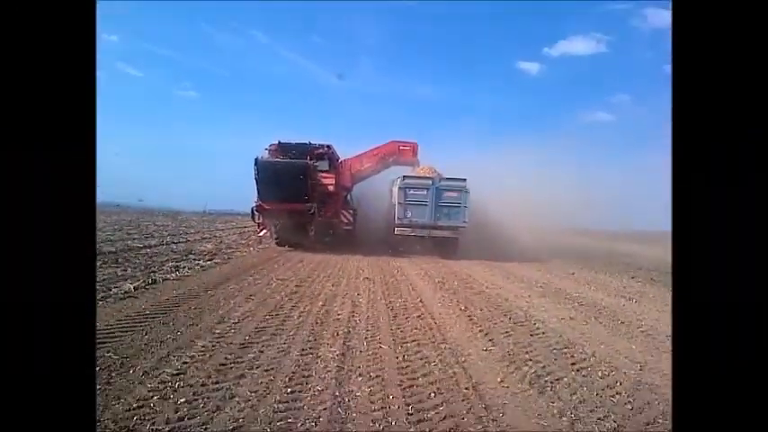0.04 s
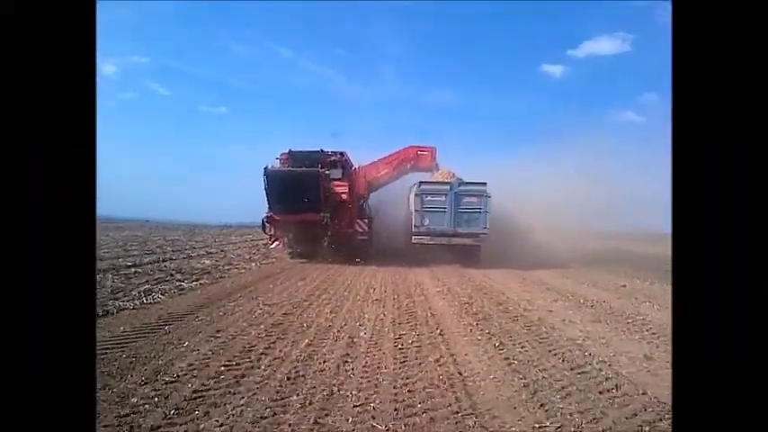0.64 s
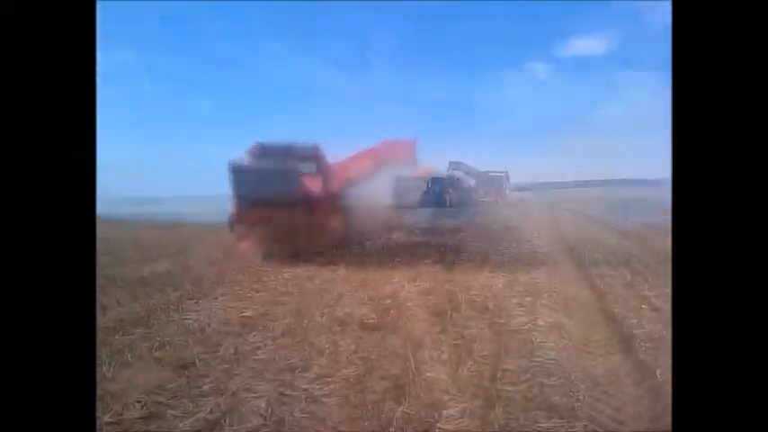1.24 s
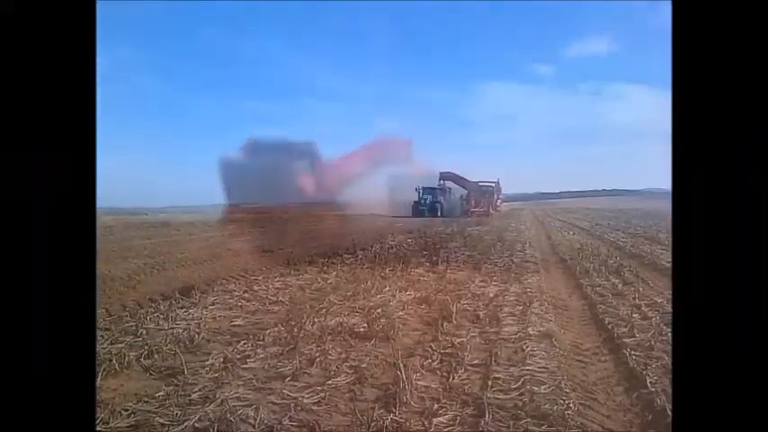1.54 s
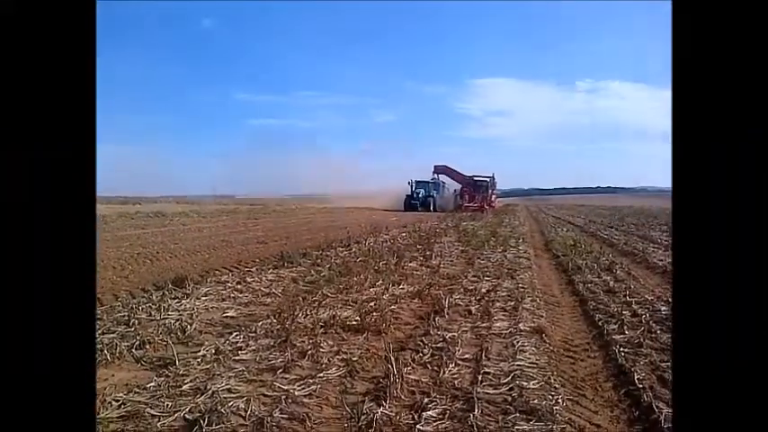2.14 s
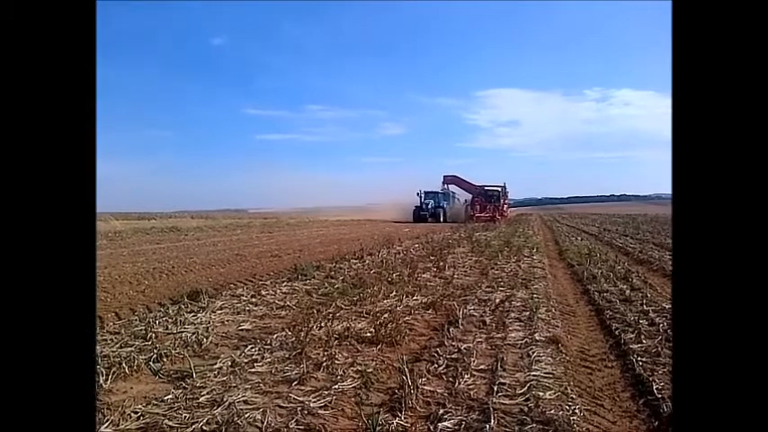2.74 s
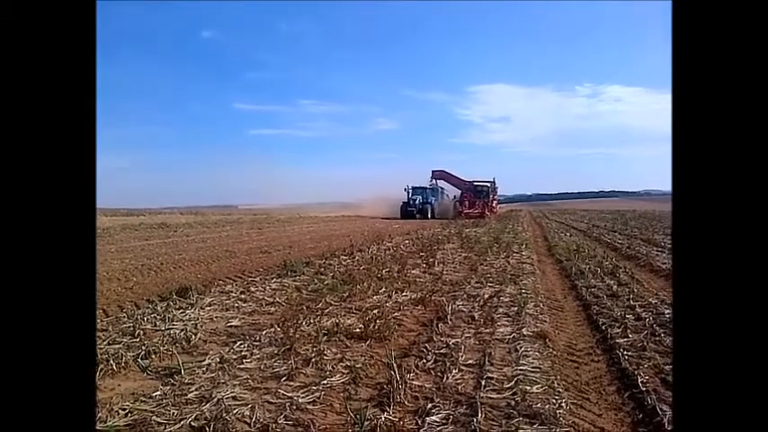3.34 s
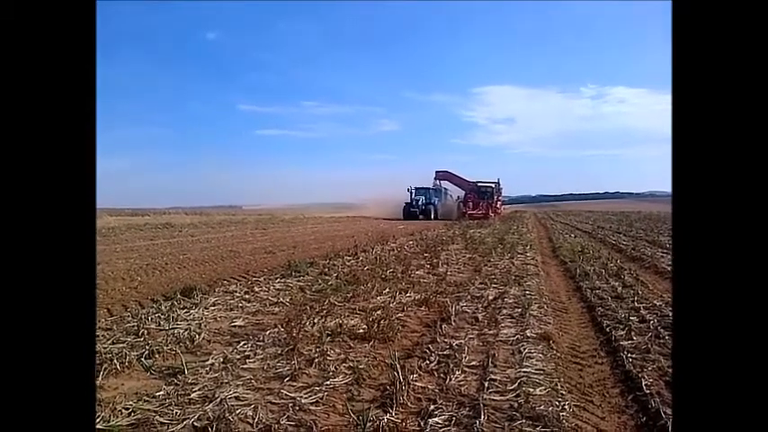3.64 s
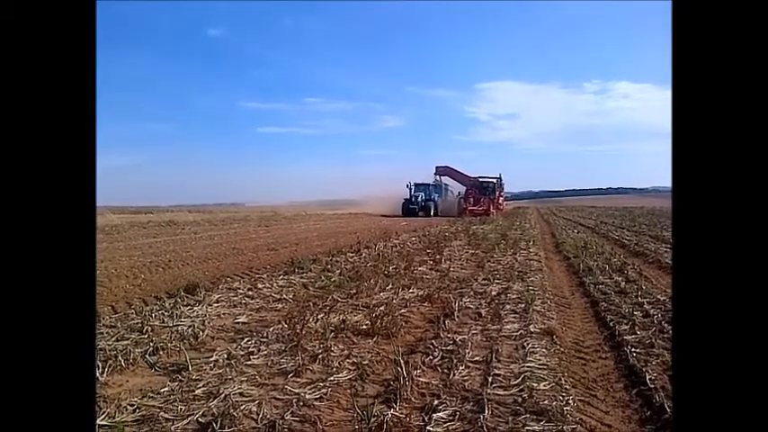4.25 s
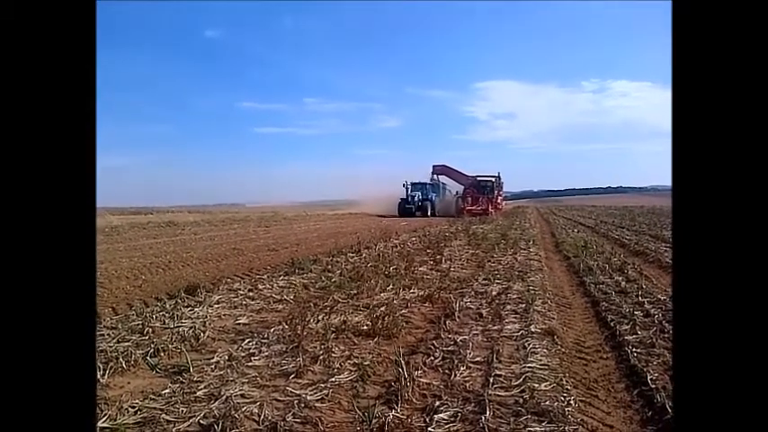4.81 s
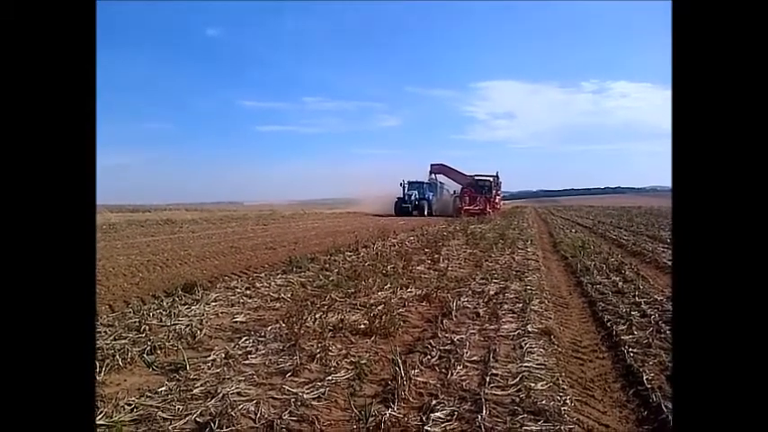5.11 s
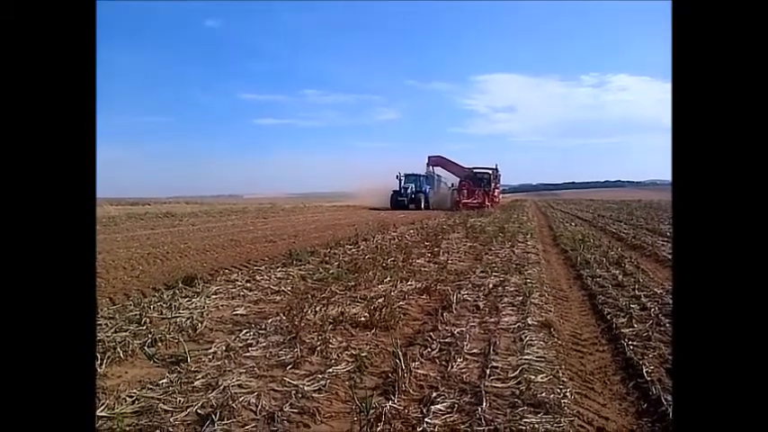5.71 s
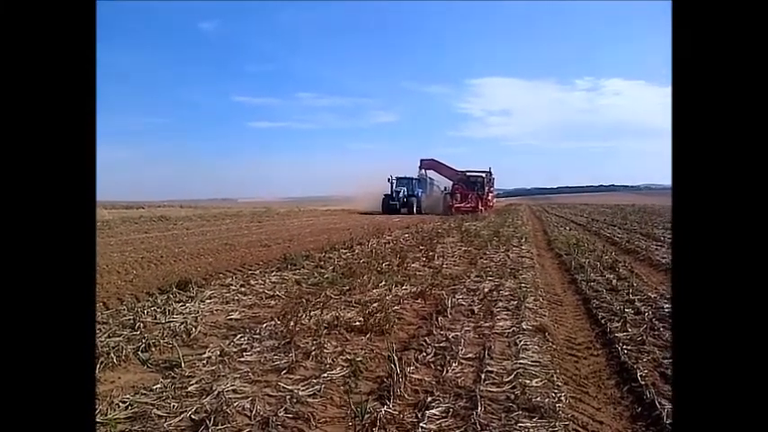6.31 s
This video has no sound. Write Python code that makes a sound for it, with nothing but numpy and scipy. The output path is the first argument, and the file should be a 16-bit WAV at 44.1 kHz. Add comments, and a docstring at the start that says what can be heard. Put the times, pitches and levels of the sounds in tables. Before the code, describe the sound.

A nearby farm harvester rumbles and rattles, giving way to quiet, far-off machinery with gusts on the microphone and dry leaves ticking.

```python
"""A root-crop harvester works close by: its diesel drones, gears whine, panels rumble and the sieve web
rattles. A dry roller squeaks, the hollow bunker booms, then stones and steel clank on the web.
From 0.84 s to about 2.1 s the scene dissolves to a harvester and tractor far away, two exhaust hums
that grow louder as they draw nearer. To the end, eddies of wind flutter on the microphone and dry
stalks rustle and tick in the breeze."""
import sys
import numpy as np
from scipy import signal
from scipy.fft import rfft, irfft, next_fast_len
from scipy.io import wavfile
from scipy.ndimage import uniform_filter1d, map_coordinates

SR = 44100
rng = np.random.default_rng(int(sys.argv[2]) if len(sys.argv) > 2 else 0)


def generate_wav(signal):
    """Clip the signal to [-1, 1] and save it as 16-bit WAV at the path in sys.argv[1]."""
    frames = np.transpose(np.atleast_2d(signal))
    scaled = np.clip(frames, -1, 1) * 32767
    pcm = np.round(scaled).astype(np.int16)
    wavfile.write(sys.argv[1], SR, pcm)


N = 280917
TIME_S = np.arange(N) / SR


def amp(db):
    """Decibels to gain."""
    return 10 ** (np.asarray(db) / 20)


def unit(x):
    """x at rms 1."""
    return x / np.sqrt(np.mean(x ** 2) + 1e-20)


def noise():
    """White noise."""
    return rng.standard_normal(N)


def wobble(rate_hz):
    """Smooth random curve, rate_hz knots a second."""
    coarse_s = TIME_S[::16]
    knots = rng.standard_normal(N // 64)
    return np.interp(TIME_S, coarse_s, map_coordinates(knots, [coarse_s * rate_hz + 2], mode="wrap"))


def swells(rows):
    """Sum of smooth bumps. Each row: centre in seconds, length in seconds, height."""
    return sum(height * np.exp(-np.abs(2 * (TIME_S - s) / length_s) ** 3) for s, length_s, height in rows)


def pulse(centre_s, half_s):
    """Bell envelope with exponential tails, peak 1."""
    return 1 / np.cosh(np.clip((TIME_S - centre_s) / half_s, -20, 20))


def ramp(start_s, end_s):
    """Linear rise from 0 to 1, then held."""
    return np.clip((TIME_S - start_s) / (end_s - start_s), 0, 1)


def filtered(x, response):
    """x through a response given as a function of Hz."""
    size = next_fast_len(len(x) + SR // 4)
    return irfft(rfft(x, size) * response(np.fft.rfftfreq(size, 1 / SR)), size)[:len(x)]


def coloured(x, spectrum):
    """x shaped by (Hz, dB) points, at rms 1."""
    points_hz, db = np.transpose(spectrum)
    return unit(filtered(x, lambda hz: amp(np.interp(np.log(hz + 1), np.log(points_hz), db))))


def steadied(x, samples):
    """x divided by its running rms."""
    return x / np.sqrt(np.abs(uniform_filter1d(x ** 2, samples)) + 1e-6)


# Engine speed. Each row: time in seconds, firing rate in Hz.
FIRING_RATE = [(0, 72.3), (.2, 71.2), (.5, 70.3), (.9, 70.1), (1.15, 68.8), (1.5, 67.8), (2.2, 67.5)]
def firing_phase():
    """Phase of the firing cycle in radians; the engine slows slightly."""
    firing_hz = np.interp(TIME_S, *np.transpose(FIRING_RATE))
    return 2 * np.pi * np.cumsum(firing_hz * (1 + .001 * wobble(12))) / SR


# Exhaust orders. Each row: multiple of the firing rate, relative level in dB.
EXHAUST_ORDERS = [(1, -25), (2, -36), (3, -45), (4, -40), (5, -50.5), (6, -59), (7, -49.5)]
# Gear and pump tones. Each row: frequency in Hz at a 70 Hz firing rate, relative level in dB.
GEAR_TONES = [(99, -39), (177.6, -38.5), (366, -46), (654, -48), (745, -52), (931, -54.5), (1121, -55.5),
              (1595, -70), (1703, -67.5), (2048, -69.5)]
def diesel(phase):
    """Firing pulses give the exhaust orders; gears and pumps follow the same shaft, less steadily."""
    exhaust = whine = 0
    for order, db in EXHAUST_ORDERS:
        gain = amp(db + 1.3 * wobble(11))
        exhaust += gain * np.sin(order * phase + .2 * wobble(18) + rng.uniform(0, 2 * np.pi))
    for hz, db in GEAR_TONES:
        gain = amp(db + 1.8 * wobble(12))
        whine += gain * np.sin(hz / 70 * phase + .3 * wobble(10))
    return amp(-2.5) * np.sqrt(2) * (exhaust + whine)


# Throb spectrum. Each row: frequency in Hz, relative density in dB.
THROB_SPECTRUM = [(8, -70), (16, -57), (21, 9), (26, 8.5), (31, 10), (40, -5), (55, -16.5), (90, -16),
                  (160, -59), (400, -120)]
# Heaves and sags. Each row: centre in seconds, length in seconds, gain in dB.
THROB_HEAVES = [(.14, 0.16, 7), (.29, 0.12, -24), (.45, 0.061, -16), (.68, 0.13, -6.5), (1.75, 0.26, -7.5),
                (2.03, 0.17, 0)]
def throb(beat_hz=7.16, crest_s=1.248, depth_db=2.5):
    """The near machine's deep throb beats, heaves and sags."""
    beat_db = depth_db * np.cos(2 * np.pi * beat_hz * (TIME_S - crest_s))
    rumble = steadied(coloured(noise(), THROB_SPECTRUM), samples=5000)
    return amp(-15.5 + beat_db + swells(THROB_HEAVES)) * rumble


# Panel spectrum. Each row: frequency in Hz, relative density in dB.
PANEL_SPECTRUM = [(15, -67), (40, 6.5), (80, -4), (130, 3), (185, -3.5), (215, -6.5), (285, -6.5),
                  (320, -16.5), (380, -14.5), (480, -20), (800, -87), (2500, -120)]
# Load surges. Each row: centre in seconds, length in seconds, gain in dB.
LOAD_SURGES = [(.02, 0.081, 6.5), (.74, 0.051, 8), (.91, 0.11, 7.5), (1.45, 0.21, 6), (1.69, 0.09, 6.5),
               (1.79, 0.24, 5.5)]
def panels():
    """Body panels rumble, louder under load."""
    return amp(-30 + swells(LOAD_SURGES)) * steadied(coloured(noise(), PANEL_SPECTRUM), samples=4000)


# Spectra of the web's din and the fine hiss. Each row: frequency in Hz, relative density in dB.
DIN_SPECTRUM = [(150, -16), (360, 1), (560, -6.5), (670, -5), (760, -8.5), (815, -12), (920, -11),
                (1130, -16), (1350, -20.5), (2580, -29.5), (4700, -35), (7000, -43), (15000, -79)]
HISS_SPECTRUM = [(1000, 3), (5000, -8), (8000, -3), (15000, -3)]
# Changes in the rattling. Each row: centre in seconds, length in seconds, gain in dB.
WEB_RATTLES = [(.07, 0.048, 1), (.16, 0.057, 2), (.86, 0.091, 1), (1.52, 0.19, -0.5), (1.84, 0.19, 2)]
def sieve_web(phase):
    """The web's din pulses with the firing; a fine hiss swells with its rattling."""
    shaking = noise() * (1 + 0.12 * np.sin(phase)) * amp(1.2 * wobble(59.8))
    din = amp(-38.5) * coloured(shaking, DIN_SPECTRUM)
    hiss = amp(-61.5) * coloured(noise(), HISS_SPECTRUM)
    return amp(swells(WEB_RATTLES)) * (din + hiss)


# Roller chirps. Each row: centre in seconds, pitch in Hz, fundamental peak in dB, half length in seconds.
ROLLER_CHIRPS = [(0.085, 5730, -57.5, 0.011), (0.153, 5900, -57, 0.0098), (1.375, 5800, -66, 0.018),
                 (1.9, 5800, -71, 0.0071)]
def roller_squeaks():
    """A dry roller chirps: a scratchy high tone with its octave."""
    out = np.zeros(N)
    for centre_s, hz, db, half_s in ROLLER_CHIRPS:
        phase = 2 * np.pi * hz * TIME_S + 1.4 * wobble(660)
        out += amp(db) * pulse(centre_s, half_s) * (np.sin(phase) + amp(-3.5) * np.sin(2 * phase))
    return out


# Bunker resonances. Each row: centre in seconds, pitch in Hz, peak in dB, half length in seconds.
BUNKER_BOOMS = [(0.109, 363.6, -26.5, 0.0087), (0.437, 281, -32, 0.072), (0.625, 168.7, -26.5, 0.019),
                (0.746, 104, -32, 0.022), (0.75, 196, -39, 0.0083), (0.906, 186, -29.5, 0.012),
                (1.396, 269, -22.5, 0.0061), (1.557, 130, -31, 0.026), (1.674, 272.6, -28, 0.0072),
                (1.683, 134.3, -32, 0.021)]
def bunker_booms():
    """A panel of the hollow bunker swells into resonance and dies away."""
    return sum(amp(db) * pulse(centre_s, half_s) * np.sin(2 * np.pi * hz * TIME_S + 0.5 * wobble(70))
               for centre_s, hz, db, half_s in BUNKER_BOOMS)


# Frame modes. Each row: frequency in Hz, bandwidth in Hz, gain in dB.
FRAME_MODES = [(330, 50, 7.5), (437, 23, 13.5), (622, 28, 13.5), (960, 49, 11.5), (1161, 24, 11),
               (1306, 72, 7), (1783, 89, 1.5), (2124, 105, -1.5), (2340, 50, -1), (2510, 70, -1),
               (3260, 18, 0), (4285, 36, 1), (4640, 22, -4), (5360, 26, -2), (4240, 2900, -10)]
def steel_frame(force, tilt_db_per_octave):
    """The steel frame rings in modes of alternating sign; the tilt sets its brightness."""
    def response(hz):
        modes = sum((-1) ** k * amp(db) * 1j * hz * width_hz / (mode_hz**2 - hz**2 + 1j * hz * width_hz)
                    for k, (mode_hz, width_hz, db) in enumerate(FRAME_MODES))
        tilt = amp(tilt_db_per_octave * np.log2(np.clip(hz, 500, 6000)))
        return modes * tilt / (1 + (hz / 12000) ** 2)
    return filtered(force, response)


# Blows. Each row: start in seconds, relative level in dB, chatter T60 in seconds, tilt in dB per octave.
WEB_BLOWS = [(0.631, -31, 0.04, -14), (0.813, -40.5, 0.068, 1), (0.857, -42, 0.06, 1),
             (1.036, -33.5, 0.088, -2.5), (1.137, -28, 0.054, -3), (1.143, -30, 0.076, -2.5),
             (1.153, -26, 0.071, -7.5), (1.162, -27, 0.057, -4.5), (1.177, -37, 0.32, -1.5),
             (1.204, -37, 0.45, -5.5), (1.219, -48.5, 0.064, 11), (1.254, -36, 0.013, -5),
             (1.323, -39.5, 0.07, -2), (1.637, -45, 0.12, -1.5), (1.682, -53, 0.03, 5),
             (1.771, -48, 0.77, -3.5), (1.926, -45.5, 0.25, -9)]
def clanks(knock_db=2.5, chatter_db=0.5):
    """Stones and steel strike the web: each knocks the frame, then a loose part bounces unevenly on it."""
    age_s = TIME_S[:SR // 2]
    attack = 1 - np.exp(-age_s / 0.0004)
    out = np.zeros(N)
    for start_s, db, t60_s, tilt in WEB_BLOWS:
        knock = steel_frame(1.0 * (age_s == 0), tilt)
        bounces = unit(amp(3 * np.clip(wobble(350)[:len(age_s)], -1, 1)))
        contacts = amp(-60 * age_s / t60_s) * bounces * rng.standard_normal(len(age_s))
        chatter = steel_frame(contacts, tilt) / np.linalg.norm(knock)
        blow = amp(knock_db) * knock / np.abs(knock).max() + amp(chatter_db) * chatter
        out[round(start_s * SR):][:len(age_s)] += amp(db) * attack * blow
    return out


# Far exhaust hums and drive whistles. Each row: frequency in Hz, relative level in dB.
EXHAUST_HUMS = [(96.7, -49.3), (77.4, -58.5)]
DRIVE_WHISTLES = [(2196, -80), (4297, -83)]
# Far machinery spectrum. Each row: frequency in Hz, relative density in dB.
WASH_SPECTRUM = [(20, -5.5), (60, 3.5), (130, 6), (200, 1), (300, -8), (420, -7.5), (560, -2.5),
                 (800, -11.5), (1000, -8.5), (1450, -19), (1750, -16), (1950, -26), (2200, -20),
                 (2500, -66), (4000, -40)]
def far_machines(approach_db):
    """Two exhaust hums, thin drive tones and a dull machinery wash waver in the moving air."""
    hums = sum(amp(db + 1.9 * wobble(20)) * np.sin(2 * np.pi * hz * TIME_S + .35 * wobble(16))
               for hz, db in EXHAUST_HUMS)
    whistles = sum(amp(db + 1.5 * wobble(9)) * np.sin(2 * np.pi * hz * TIME_S + 1.5 * wobble(45))
                   for hz, db in DRIVE_WHISTLES)
    wash = amp(-52.5 + 0.54 * approach_db + 0.16 * wobble(3.4)) * coloured(noise(), WASH_SPECTRUM)
    return amp(approach_db) * (np.sqrt(2) * hums + whistles) + wash


# Gusts. Each row: centre in seconds, length in seconds, gain in dB.
WIND_GUSTS = [(2.33, 0.36, 2), (2.54, 0.047, 3), (2.8, 0.16, 4.5), (3.48, 0.16, 4), (3.73, 0.16, 3.5),
              (4.32, 0.23, 1), (4.56, 0.049, 0.5), (4.78, .06, 0.5), (4.87, 0.032, 3), (5.42, 0.051, 0.5)]
# Lulls. Each row: start in seconds, end in seconds, depth in dB.
WIND_LULLS = [(3.097, 3.13, 3), (3.826, 4.085, 14), (4.423, 4.526, 8.5), (4.913, 4.966, 14),
              (5.126, 5.23, 5), (5.24, 5.37, 22), (6.24, 6.32, 6)]
def wind_strength_db(edge_s=0.014):
    """A restless breeze: gusts swell over it, lulls cut in abruptly."""
    step = lambda s: (1 + np.tanh((TIME_S - s) / edge_s)) / 2
    lull_db = sum(depth_db * (step(start_s) - step(end_s)) for start_s, end_s, depth_db in WIND_LULLS)
    return -49.5 + 1.53 * wobble(22.02) + swells(WIND_GUSTS) - lull_db


def eddies(times_s, gains, halves_s, skews_rad):
    """Each passing eddy is one push of pressure with suction beside it; skew makes it lopsided."""
    index = np.round(times_s * SR).astype(int)[:, None] + np.arange(-SR // 50, SR // 50)
    offset = (index / SR - times_s[:, None]) / halves_s[:, None]
    shape = np.real(np.exp(1j * skews_rad[:, None]) / (1 + 1j * offset) ** 2)
    pressure = gains[:, None] * shape * np.hanning(index.shape[1])
    return np.bincount(index.ravel() % N, pressure.ravel(), N)


def wind_flutter(count=2400, stall_db=-60):
    """Eddies flutter on the microphone, smaller and sharper in gusts, silent below the stall level."""
    wind_db = wind_strength_db()
    flow = np.sqrt(np.maximum(amp(wind_db) ** 2 - amp(stall_db) ** 2, 0))
    when, skew = rng.random(size=(count, 2)).T
    width, strength = np.clip(rng.standard_normal((count, 2)), -2, 2).T
    excess_db = np.clip(wind_db[(when * N).astype(int)] + 45.5, -6, 6)
    halves_s = 0.00078 * amp(4.03 * width - 0.38 * excess_db)
    train = eddies(when * N / SR, amp(1.14 * strength + 0.49 * width), halves_s, 2 * np.pi * skew)
    spectrum = [(12, -17), (40, -3), (120, 0.5), (250, 2), (500, -1.5), (1000, -7), (2000, -6), (5000, 1)]
    return amp(2) * flow * steadied(coloured(train, spectrum), samples=3000)


def leaf_bursts(contacts, decay_s=.0012):
    """Envelope in which each leaf contact lasts a few milliseconds."""
    return signal.fftconvolve(contacts, np.exp(-TIME_S[:SR // 50] / decay_s))[:N]


# Spectra of stalks and leaves. Each row: frequency in Hz, relative density in dB.
RUSTLE_SPECTRUM = [(1000, -9), (2000, 2.5), (2550, -3.5), (2800, 3.5), (3800, 6), (4900, 3), (5600, -4),
                   (6300, -6.5), (8000, -12), (15000, -64)]
CRACKLE_SPECTRUM = [(1500, -12), (4000, 5.5), (6500, 7.5), (8100, -4.5), (8700, 2.5), (9400, 2.5),
                    (10000, -9), (10900, 2), (11600, 0), (12100, 0), (12800, -5), (13850, -18), (14600, -4),
                    (15300, -5)]
# Breeze through the stalks. Each row: centre in seconds, length in seconds, crackle gain in dB.
BREEZE_SWEEPS = [(2.26, 0.094, 4), (2.98, 0.063, 4), (3.26, 0.18, 4), (3.62, 0.51, 6.5), (3.9, 0.15, 5),
                 (4.54, 0.28, 5), (4.91, 0.34, 6), (5.2, 0.26, 6.5), (5.66, 0.14, 6.5), (5.83, 0.21, 10.5),
                 (6.08, 0.056, 6), (6.2, 0.46, 2)]
def stalks(approach_db, contacts_per_s=130):
    """Dry stalks hiss in the breeze; their leaves crackle against each other."""
    sweep_db = swells(BREEZE_SWEEPS)
    contacts = (rng.random(N) < contacts_per_s / SR) * amp(3 * np.clip(noise(), -2, 2))
    grains = unit(leaf_bursts(contacts) * noise())
    crackle_db = -73.5 + sweep_db + 1.8 * wobble(17)
    crackle = amp(crackle_db) * coloured(grains + 0.83 * noise(), CRACKLE_SPECTRUM)
    rustle = amp(-65.5 + 0.15 * sweep_db + 1.35 * approach_db) * coloured(noise(), RUSTLE_SPECTRUM)
    return rustle + crackle


def shrill_hiss(centre_s=2, length_s=2.7):
    """A narrow hiss rises and fades as the field opens."""
    spectrum = [(2400, -50), (3000, -3), (3250, 0), (3550, -3), (4300, -50)]
    return swells([(centre_s, length_s, amp(-73))]) * coloured(noise(), spectrum)


# Direct eddy hits. Each row: centre in seconds, relative level in dB, half width in seconds.
EDDY_HITS = [(2.284, -46, 0.0006), (2.343, -41, 0.00034), (2.541, -35, 0.0008), (2.731, -33.5, 0.00068),
             (2.813, -31, 0.00065), (2.846, -34, 0.0008), (3.054, -33.5, 0.0011), (3.425, -28.5, 0.00079),
             (3.4322, -23.5, 0.00067), (3.455, -27, 0.00077), (3.458, -23.5, 0.00044),
             (3.463, -40, 0.00026), (3.4722, -44, 0.00032), (3.478, -30, 0.0034), (3.484, -27, 0.0005),
             (3.4866, -32, 0.00023), (3.489, -27, 0.0007), (3.497, -26.5, 0.00046), (3.516, -28, 0.0017),
             (3.532, -31, 0.0016), (3.542, -35, 0.00052), (3.633, -45, 0.00074), (3.679, -38, 0.00087),
             (3.732, -34, 0.0007), (3.765, -30, 0.00066), (4.571, -38, 0.00055), (4.781, -33.5, 0.00055),
             (4.882, -35.5, 0.0009), (4.994, -33.5, 0.00088), (5.113, -37, 0.00076), (5.431, -31.5, 0.0011),
             (5.474, -42, 0.00058), (6.125, -32.5, 0.00078), (6.229, -29.5, 0.00088)]
def wind_puffs():
    """Single eddies hit the microphone squarely."""
    times_s, db, halves_s = np.transpose(EDDY_HITS)
    return eddies(times_s, amp(db), halves_s, rng.uniform(0, 2 * np.pi, len(times_s)))


# Leaf snaps. Each row: start in seconds, relative level in dB.
LEAF_SNAPS = [(3.737, -52), (4.503, -53), (4.9283, -52), (5.1072, -49.5), (5.256, -48.5), (5.595, -49.5),
              (5.774, -47), (6.053, -48), (6.0765, -54)]
def leaf_snaps():
    """Single dry leaves snap, each a tick of bright noise."""
    contacts = np.zeros(N)
    for start_s, db in LEAF_SNAPS:
        contacts[round(start_s * SR)] = amp(db + 1.5)
    spectrum = [(1500, -25), (3000, -5), (5000, 3), (8000, -5), (15000, -30)]
    return leaf_bursts(contacts) * coloured(noise(), spectrum)


def scene():
    """The near drone crossfades to the open field; clanks, booms and squeaks bypass the fade."""
    phase = firing_phase()
    near = diesel(phase) + throb() + panels() + sieve_web(phase)
    events = clanks() + bunker_booms() + roller_squeaks()
    approach_db = 5.5 * (ramp(start_s=1.8, end_s=3.33) - 1)
    field = far_machines(approach_db) + wind_flutter() + wind_puffs()
    field += stalks(approach_db) + leaf_snaps() + shrill_hiss()
    fade = ramp(start_s=0.84, end_s=2.146)
    return ((1 - fade) * near + events + fade * amp(1.5) * field)[None]


def record(dry):
    """Brick-wall low-pass at 15.6 kHz."""
    return np.array([filtered(x, lambda hz: hz < 15600) for x in dry])


dry = scene()
out = record(dry)
generate_wav(out)
```